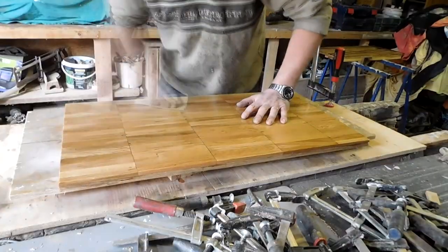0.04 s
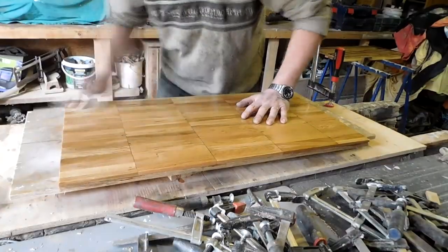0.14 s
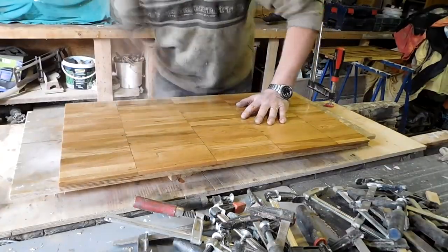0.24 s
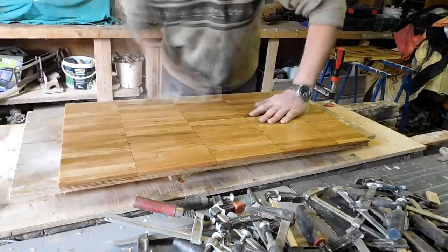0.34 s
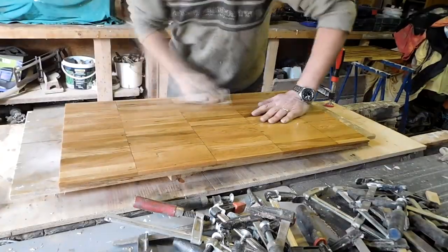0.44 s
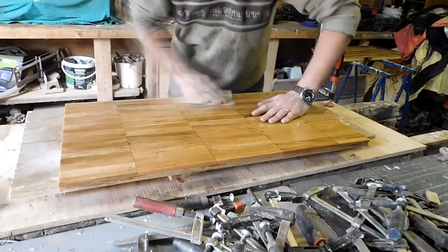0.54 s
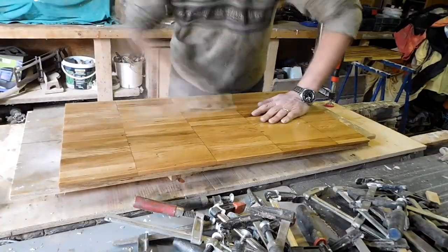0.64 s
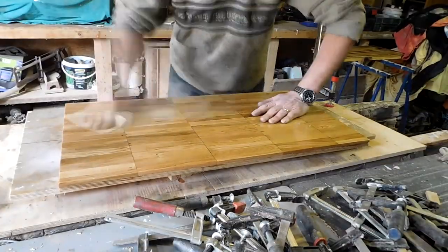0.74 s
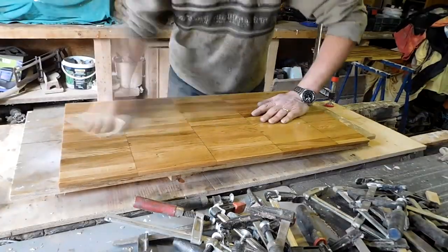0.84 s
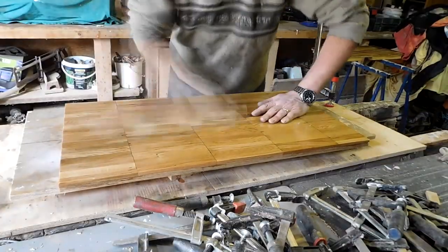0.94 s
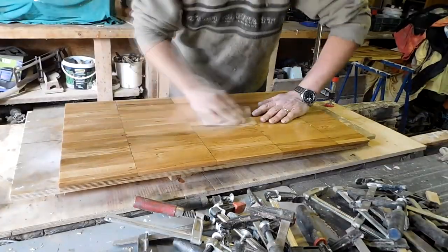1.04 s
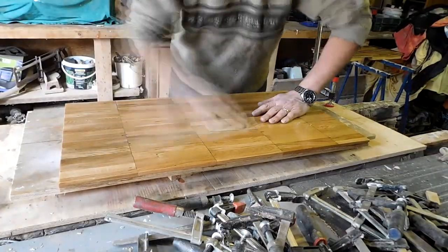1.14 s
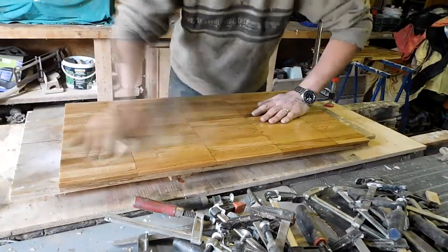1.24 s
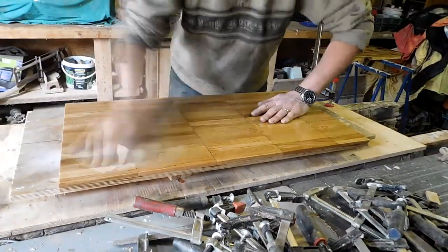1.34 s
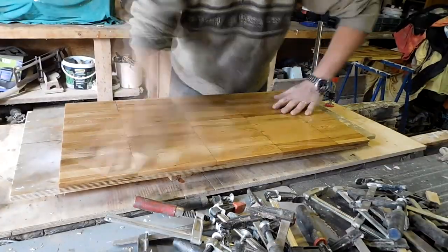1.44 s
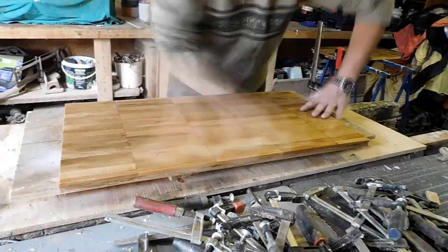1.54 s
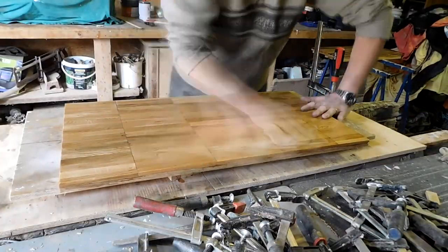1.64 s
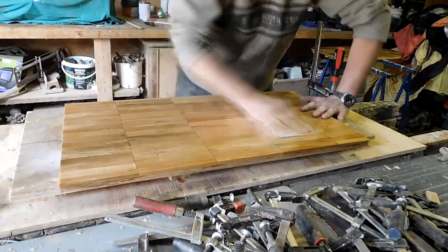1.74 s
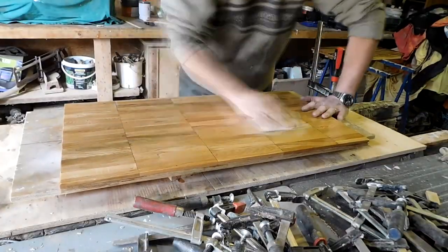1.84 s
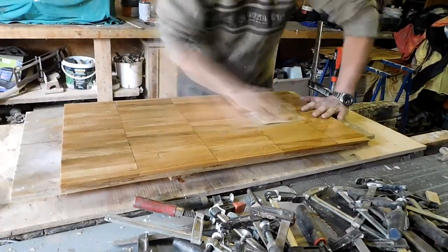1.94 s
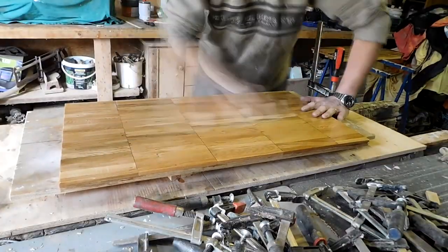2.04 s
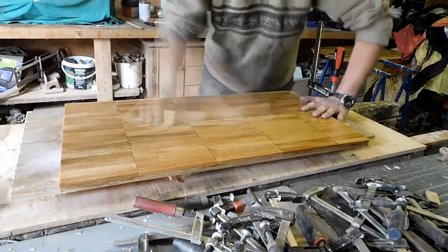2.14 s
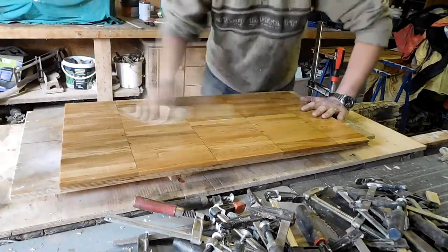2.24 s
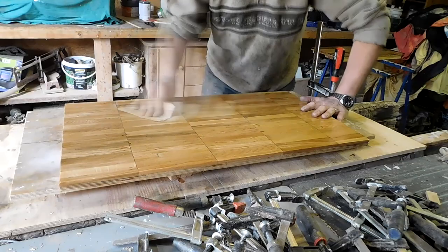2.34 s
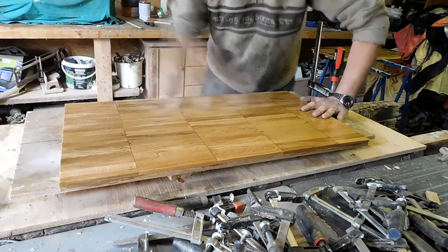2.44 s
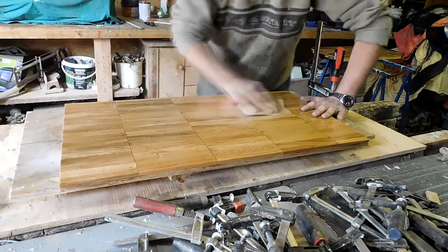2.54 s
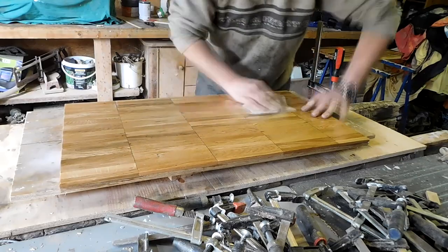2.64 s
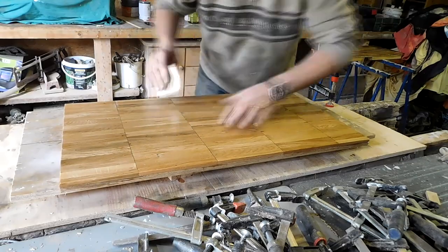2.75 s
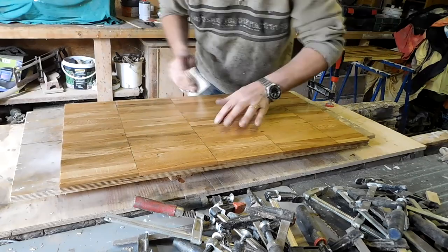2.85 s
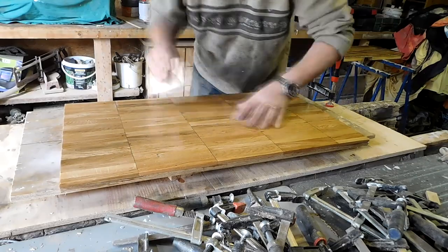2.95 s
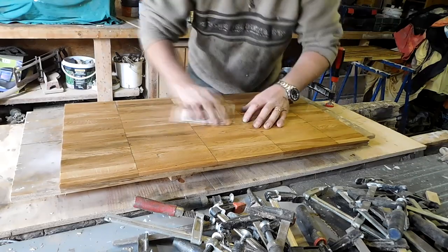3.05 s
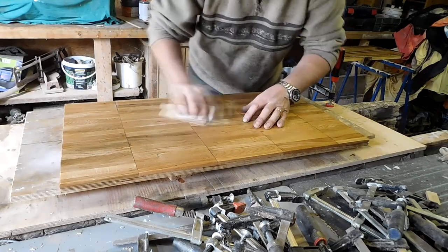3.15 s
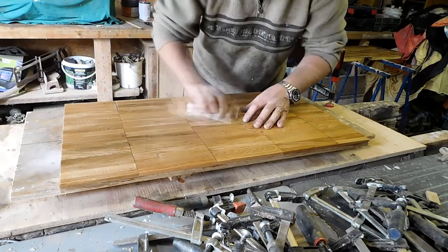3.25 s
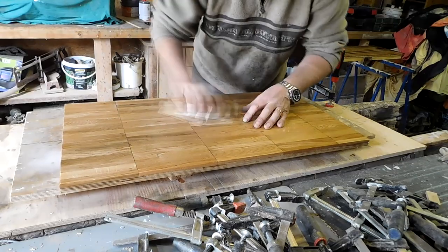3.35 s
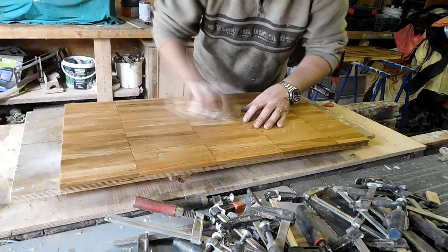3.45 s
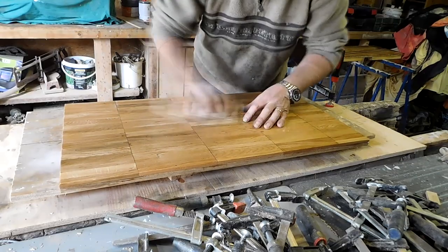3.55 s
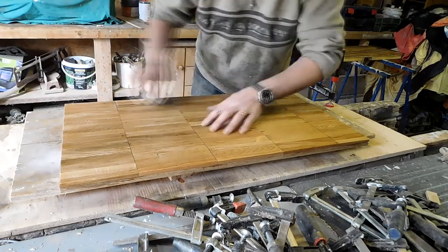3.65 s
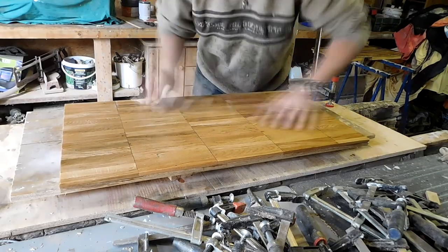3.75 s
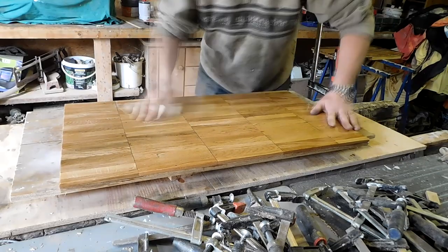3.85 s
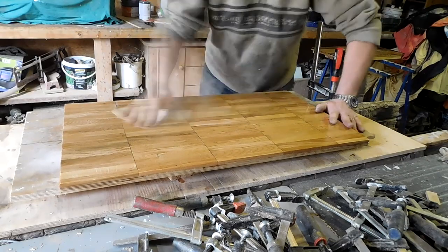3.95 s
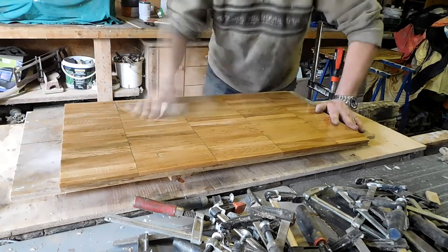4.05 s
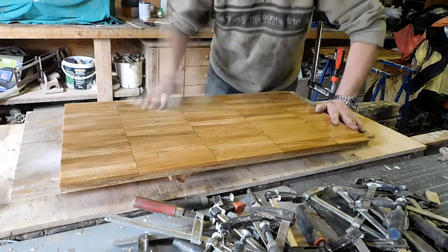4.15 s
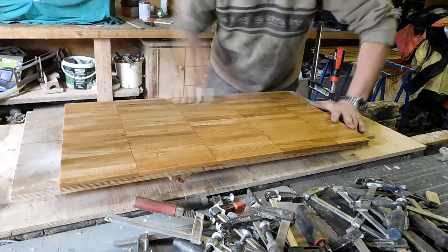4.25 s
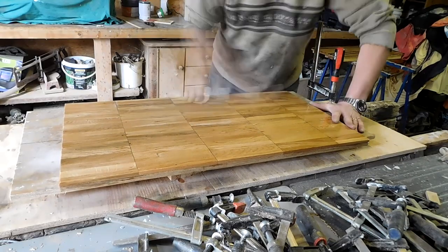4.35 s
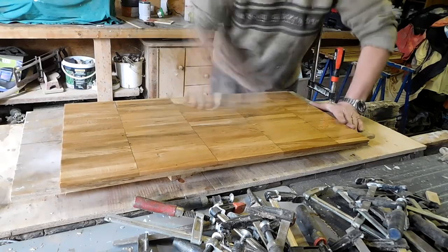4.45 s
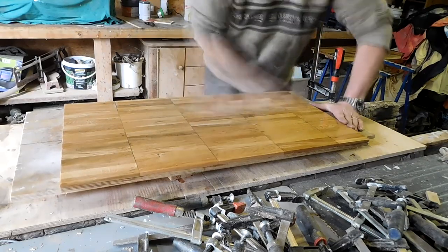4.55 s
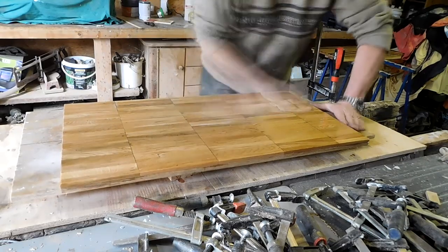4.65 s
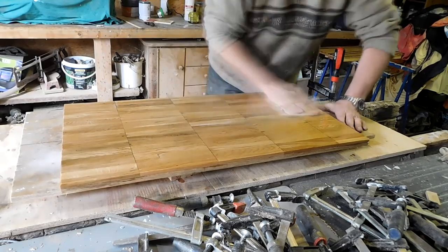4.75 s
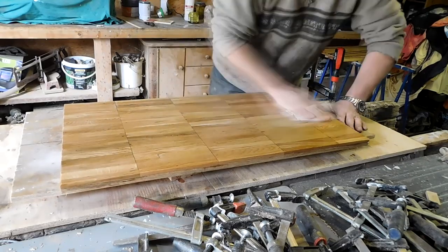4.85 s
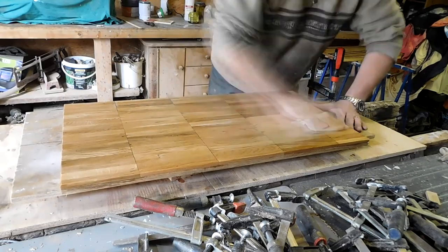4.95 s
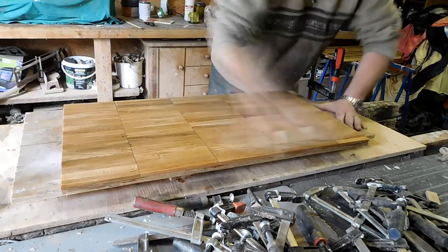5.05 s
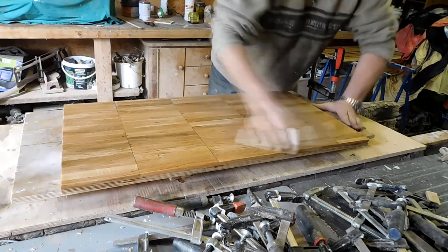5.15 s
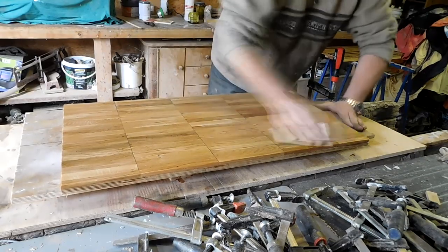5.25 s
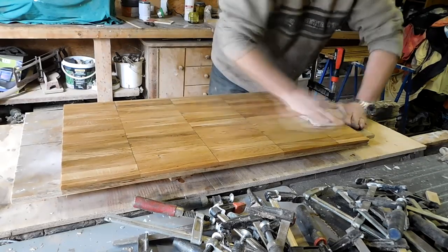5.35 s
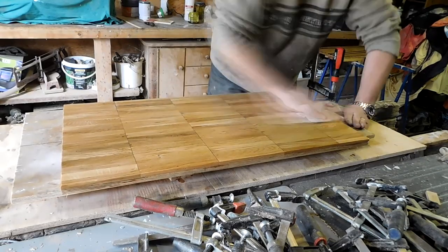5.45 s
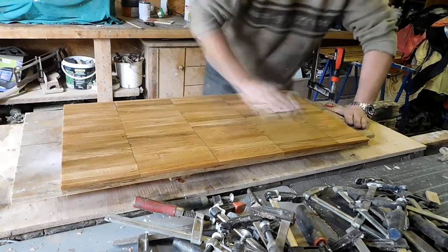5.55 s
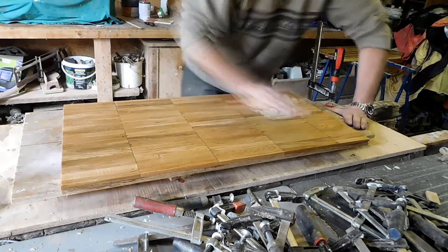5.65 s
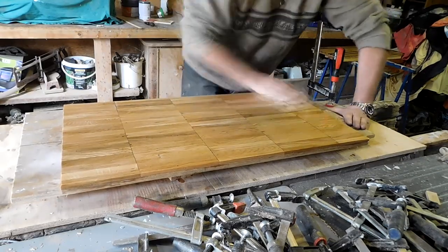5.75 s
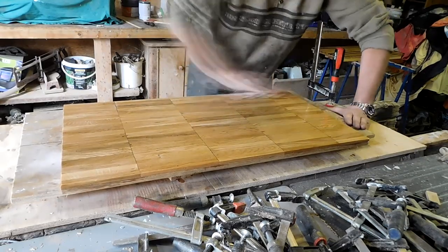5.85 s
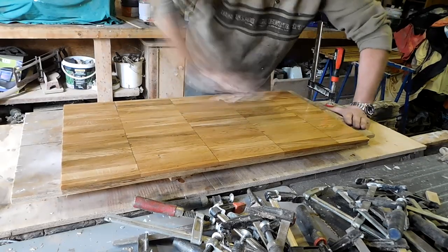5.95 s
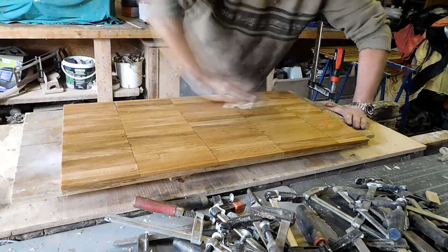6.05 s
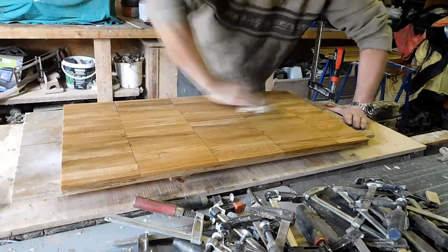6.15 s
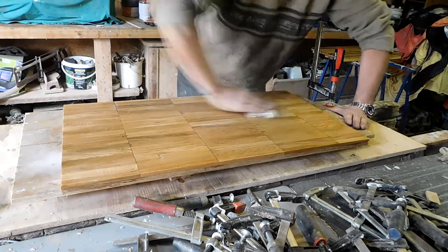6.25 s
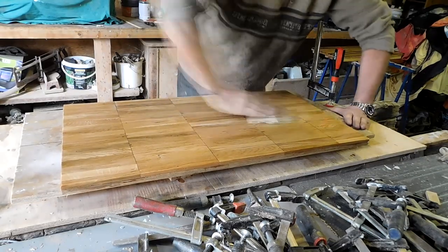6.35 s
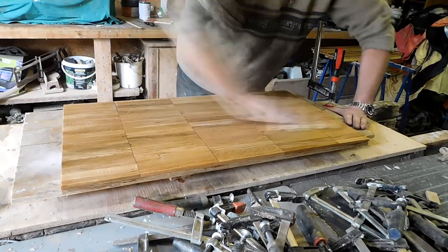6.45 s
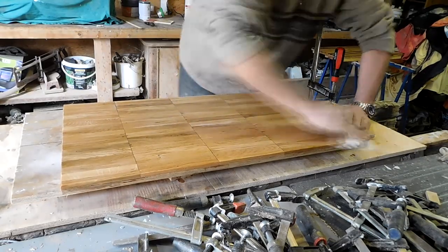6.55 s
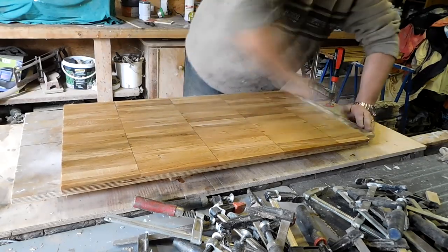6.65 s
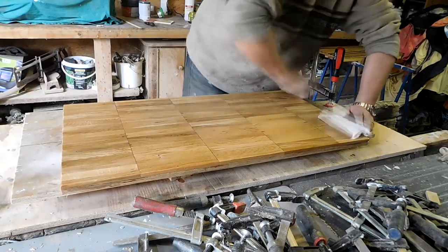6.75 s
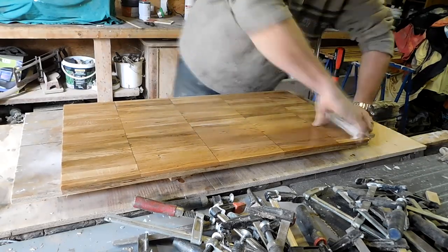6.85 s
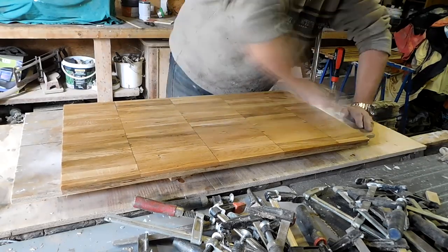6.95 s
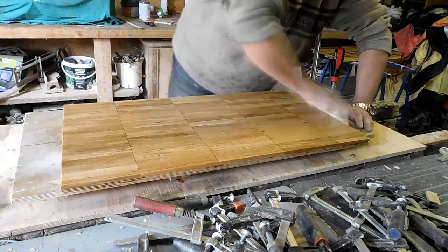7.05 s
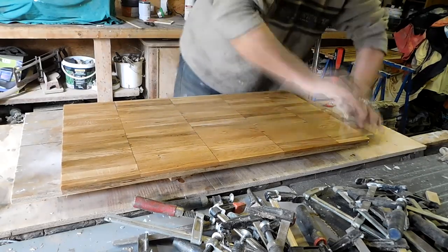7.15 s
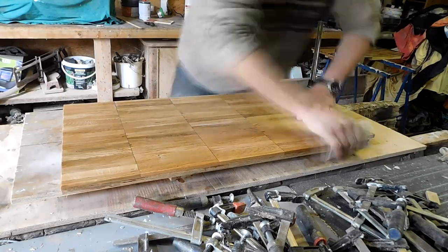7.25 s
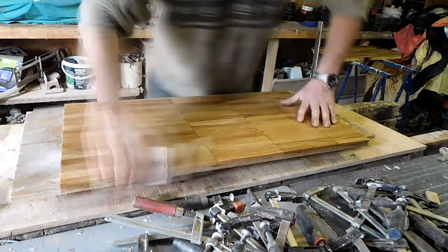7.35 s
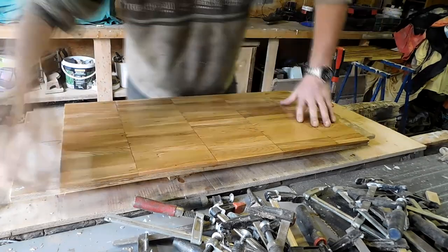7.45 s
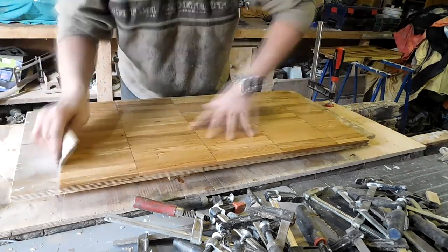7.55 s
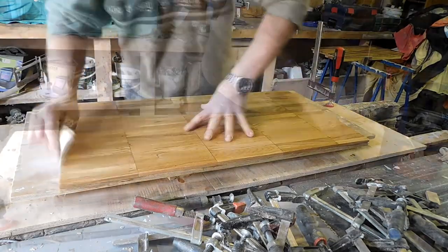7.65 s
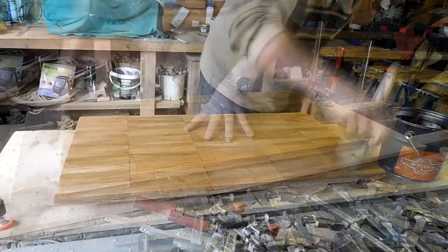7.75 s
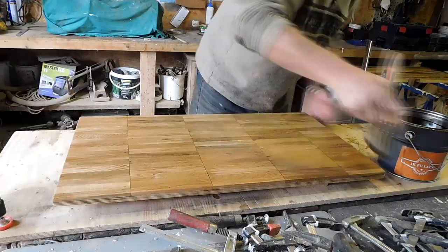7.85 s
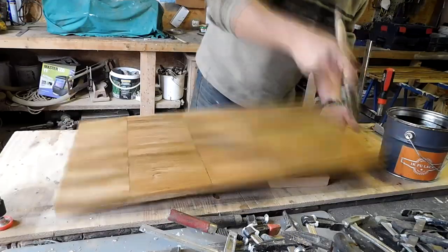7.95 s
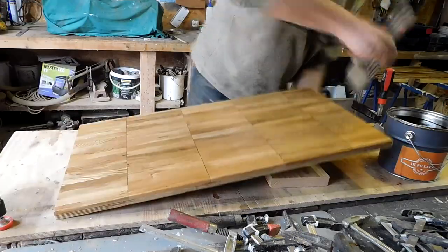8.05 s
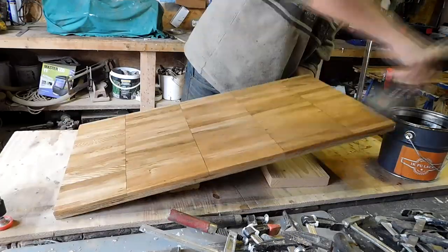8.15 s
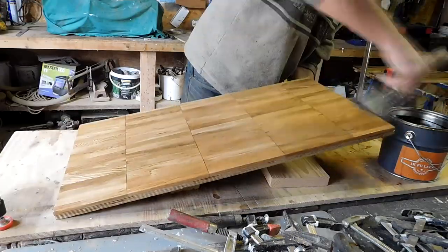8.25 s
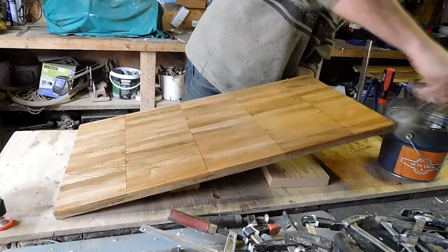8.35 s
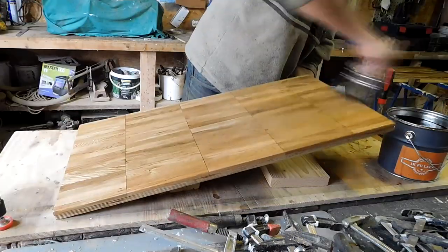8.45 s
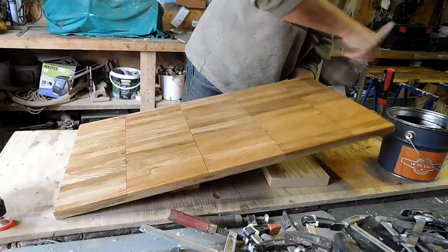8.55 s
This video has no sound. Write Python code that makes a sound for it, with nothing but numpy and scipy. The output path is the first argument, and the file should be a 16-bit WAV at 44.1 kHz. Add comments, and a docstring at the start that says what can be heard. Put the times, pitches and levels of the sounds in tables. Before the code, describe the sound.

A hand sands wood with gritty paper, quickly back and forth, bright and scratchy. There is a short pause, a few rough scuffs, another pause, then firm strokes again that gradually soften, with a dull bump or two. Final separate swipes give way to one strong, rough wooden knock, then only tiny soft rustles. Heard closely in a small workshop with faint dull background air.

```python
"""Sandpaper scrubs a wooden board in a workshop, in very quick hand strokes, lifted now and then.
Grit is a dense click train: its hiss, fizz, hum and board body follow the stroke and dip at each turn.
The paper chatters in narrow noise bands and rustles when off the wood; noise pushes ring the board's modes,
loudest near the end as the board is knocked down on its block. A low hum sounds as the board is shifted.
Short echoes and a quiet air noise make the workshop."""
import sys
import numpy as np
from scipy import signal
from scipy.fft import rfft, irfft, next_fast_len
from scipy.io import wavfile
from scipy.ndimage import uniform_filter1d

SR = 44100
rng = np.random.default_rng(int(sys.argv[2]) if len(sys.argv) > 2 else 0)


def gain_from_db(level_db):
    """Convert decibel levels to linear amplitude factors (20 dB per decade)."""
    decades = np.asarray(level_db, float) / 20
    return 10 ** decades


def dump(signal):
    """Clip the signal to [-1, 1] and save it as 16-bit WAV at the path in sys.argv[1]."""
    limited = np.clip(np.atleast_2d(signal).T, -1, 1)
    pcm = np.round(limited * 32767).astype(np.int16)
    wavfile.write(sys.argv[1], SR, pcm)


N = 379260


def evened(x):
    """Scales to rms 1."""
    return x / np.sqrt(np.mean(x ** 2) + 1e-20)


def read(points, hz):
    """Interpolates a table on a log-frequency axis."""
    f, value = np.transpose(points)
    return np.interp(np.log(hz + 1), np.log(f + 1), value)


def coloured(x, points):
    """Filters x by a (hz, gain_db) table, then scales to rms 1."""
    size = next_fast_len(N)
    gain = gain_from_db(read(points, np.fft.rfftfreq(size, 1 / SR)))
    return evened(irfft(rfft(x, size) * gain, size)[..., :N])


def turns():
    """Times (s) and depths (dB) of the hand's turns: evenly spread through each run, then jittered."""
    # runs of even strokes: first_turn_s, strokes_until_next_row, even_turn_dip_db, odd_turn_dip_db
    runs = [(0.043, 3, 5.5, 3.5), (0.152, 1, 5.5, 0), (0.186, 6, 6, 8.5), (0.449, 5, 9.5, 8.5),
            (0.673, 7, 8.5, 10), (0.967, 15, 7, 7.5), (1.601, 1, 7, 8.5), (1.655, 8, 10, 9.5),
            (2.024, 7, 10.5, 9), (2.34, 8, 7.5, 11.5), (2.687, 1, 10, 6), (3.309, 5, 6, 5),
            (3.48, 5, 6.5, 9), (3.651, 1, 4.5, 0), (3.881, 4, 12, 6), (4.082, 4, 9.5, 5.5),
            (4.284, 2, 9, 6.5), (4.377, 4, 14.5, 4), (4.565, 4, 9, 8), (4.752, 6, 8.5, 5),
            (5.026, 6, 9.5, 5.5), (5.289, 4, 10.5, 7), (5.447, 2, 12, 8), (5.521, 3, 9, 3),
            (5.63, 5, 2.5, 1.5), (5.801, 4, 5, 2), (5.961, 3, 7, 10), (6.101, 4, 8, 12), (6.288, 1, 6, 2),
            (6.335, 2, 5, 4), (6.425, 1, 6, 1), (6.716, 1, 9.5, 0), (6.779, 1, 7.5, 0),
            (7.078, 1, 9.5, -0.5), (7.424, 1, 6, 0), (7.475, 1, 11.5, 0), (7.629, 2, 13, 8),
            (7.735, 1, 6, 0), (7.771, 1, 8.5, 0)]
    uneven_s, uneven_db = 0.001, 0.9
    rows = []
    for (start_s, strokes, even_db, odd_db), following in zip(runs, runs[1:] + runs[-1:]):
        for k in range(round(strokes)):
            turn_s = start_s + (following[0] - start_s) * k / round(strokes)
            rows.append((turn_s, (even_db, odd_db)[k % 2]))
    jitter = rng.standard_normal((len(rows), 2)) * [uneven_s, uneven_db]
    return (np.array(rows) + jitter).T


def dip_db(t, turn_s=0.036, sharp=2.44):
    """The hand slows into each turn and speeds up out of it, so the hiss dips there."""
    s, depth_db = turns()
    nearest = np.searchsorted((s[1:] + s[:-1]) / 2, t)
    return depth_db[nearest] * np.clip(1 - abs(t - s[nearest]) / turn_s, 0, 1) ** sharp


def touch_db(t):
    """Hiss level and relative fizz level: paper lands, bites and lifts, leaving a rustle in between."""
    # bite of the paper on the wood: time_s, mid_stroke_hiss_db
    pressure = [(0.0, -39.5), (0.26, -36), (0.515, -36), (0.95, -38), (1.37, -38), (1.5, -40), (1.78, -37),
                (2.7, -37), (2.72, -40.5), (2.738, -52), (2.762, -44), (2.785, -58), (3.069, -52),
                (3.111, -59), (3.191, -42), (3.215, -46.5), (3.34, -48), (3.643, -42.5), (3.842, -39.5),
                (3.912, -34), (3.96, -35), (4.389, -39.5), (4.966, -37.5), (5.3, -44), (6.03, -43.5),
                (6.58, -47), (6.63, -57), (6.665, -45.5), (6.7, -41), (6.806, -45.5), (6.925, -60),
                (7.008, -44), (7.055, -38), (7.169, -45.5), (7.276, -53), (7.346, -41), (7.389, -34.5),
                (7.446, -40), (7.51, -39), (7.62, -52), (7.71, -48), (7.78, -44.5), (7.822, -42),
                (8.234, -78.5), (8.49, -77), (8.575, -60)]
    # paper on the wood: lands_s, lifts_s, landing_db_per_s, fizz_over_hiss_db (at firm pressure),
    # rustle_db (settled, after the lift)
    touches = [(0.0, 2.785, 903, -4, -86), (3.065, 3.645, 1600, -22, -79), (3.84, 6.626, 1150, -6.5, -70),
               (6.635, 6.81, 400, -5, -72.5), (6.922, 6.94, 620, -16, -79), (7.008, 7.176, 550, -11, -72),
               (7.269, 7.281, 1500, -25, -78), (7.346, 7.504, 760, -14, -67), (7.62, 7.83, 300, -6, -81.5),
               (8.234, 8.27, 53, -7, -92), (8.35, 8.51, 190, -10, -89), (8.575, 8.64, 570, 0, -78)]
    lifting_db_per_s = 589
    flap_db, flap_s = 12, 0.046  # extra rustle just after a lift, and its decay
    fizz_follows, firm_db = 0.67, -37  # fizz weakens more than hiss below firm pressure
    lands, lifts, landing, fizz_db, rustle_db = np.transpose(touches)
    bites = []
    for land_s, lift_s, rate in zip(lands, lifts, landing):
        held_db = np.interp(t.clip(land_s, lift_s), *np.transpose(pressure))
        off_db = np.maximum(rate * (land_s - t), lifting_db_per_s * (t - lift_s)).clip(0)
        bites.append(held_db - off_db)
    bite_db = np.max(bites, 0)
    last = np.searchsorted(lifts, t).clip(1) - 1
    flapping_db = flap_db * np.exp(-abs(t - lifts[last]) / flap_s)
    rustle_db = np.where(t > lifts[0], rustle_db[last] + flapping_db, -120)
    nearest = np.searchsorted((lifts[:-1] + lands[1:]) / 2, t)
    eased_db = np.clip(firm_db - np.interp(t, *np.transpose(pressure)), -5, 10)
    return np.maximum(bite_db, rustle_db), fizz_db[nearest] - fizz_follows * eased_db


def grains(per_s, spread_db, patchy_db):
    """Grit tears fibres: a dense click train, patchy in time and pitch, placed between two ears."""
    # hand position: time_s, left_ear_lag_us
    place = [(0, -32), (1.3, -13), (1.7, 16), (4.1, -4.5), (4.8, 24), (7.2, 46.5), (7.7, -64), (8.2, -38)]
    # left-right likeness: hz, likeness (0-1)
    likeness = [(60, 0.4), (400, 0.65), (2400, 0.81), (15000, 0.41)]
    # microphone pair: hz, left_over_right_db
    bias = [(900, 0.5), (3000, -1.5), (15000, 3)]
    size = gain_from_db(spread_db * np.minimum(rng.exponential(1, (2, N)), 4))
    clicks = size * (rng.random((2, N)) < per_s / SR) * rng.standard_normal((2, N))
    hz, t, z = signal.stft(clicks, SR, nperseg=256, noverlap=192)
    patches = rng.standard_normal((len(t), len(hz))).T
    patches = uniform_filter1d(patches, size=4, axis=0)
    patches = evened(uniform_filter1d(patches, size=24, axis=1))
    same = np.clip(read(likeness, hz), 0, 1)[:, None]
    lag_us = np.interp(t, *np.transpose(place))
    near = gain_from_db(-0.012 * lag_us)  # the nearer ear is a little louder
    left = z[0] * np.exp(-2j * np.pi * hz[:, None] * 1e-6 * lag_us) * near
    right = (same * z[0] + np.sqrt(1 - same ** 2) * z[1]) / near
    lean = gain_from_db(read(bias, hz) / 2)[:, None]
    pair = np.array([left * lean, right / lean]) * gain_from_db(patchy_db * patches)
    return signal.istft(pair, SR, nperseg=256, noverlap=192)[1][:, :N]


def sanding():
    """Hiss, fizz, hum and board body follow the stroke: fizz dips most at a turn, the heavy board least."""
    # spectra of the four layers: hz, gain_db (relative)
    hiss_shape = [(900, -61), (1900, -14), (3000, -0.5), (5000, 0.5), (9000, -11.5), (16000, -25)]
    fizz_shape = [(3500, -29.5), (7000, 2), (11000, -3), (16000, -8.5)]
    hum_shape = [(450, -34.5), (750, -5), (970, -7), (1160, -1.5), (1480, -5), (2300, -3), (3600, -16.5),
                 (6000, -59)]
    body_shape = [(30, -69), (80, -33), (160, -19), (260, -14), (330, -9), (440, -1.5), (560, -3),
                  (900, -22)]
    # scuff hum and low board body: time_s, hum_over_hiss_db, body_over_hiss_db
    scuff = [(0.05, -2.5, -22), (0.3, -7, -23.5), (0.7, -5, -19.5), (2.72, -4.5, -20.5), (3.08, 5, -8),
             (3.14, 5, -18), (3.2, 0.5, -20), (3.25, 0, -21), (3.35, 0.5, -14.5), (3.62, -4.5, -17.5),
             (3.76, 10, -14), (3.86, -6.5, -21.5), (4.1, -5.5, -20.5), (4.5, -4.5, -13), (4.9, -7.5, -20),
             (5.25, -3.5, -14.5), (5.8, -1, -15.5), (6.55, -2, -11.5), (6.62, 4, -7), (6.7, 1, -11.5),
             (7.05, -3, -20), (7.27, 10, 1.5), (7.4, -6.5, -22.5), (7.6, 9.5, 3), (7.8, 0.5, -15.5),
             (7.87, 2.5, -9), (7.92, 17, 6), (8.3, 11, -4), (8.56, 3.5, -18)]
    t = np.arange(N) / SR
    full_db, fizz_db = touch_db(t)
    turn_db = dip_db(t)
    s, *levels = np.transpose(scuff)
    hum_db, body_db = (np.interp(t, s, level) for level in levels)
    grit = grains(per_s=26000, spread_db=1.1, patchy_db=1.2)
    hiss = coloured(grit, hiss_shape) * gain_from_db(full_db - turn_db)
    fizz = coloured(grit, fizz_shape) * gain_from_db(full_db - 1.95 * turn_db + fizz_db)
    hum = coloured(grit, hum_shape) * gain_from_db(full_db - 0.79 * turn_db + hum_db)
    body = coloured(grit, body_shape) * gain_from_db(full_db - 0.5 * turn_db + body_db)
    return hiss + fizz + hum + body


def narrow_noise(start_s, end_s, hz, pole_width_hz, level_db, fade_s):
    """Noise through four equal resonant poles, shifted to hz, faded in and out, alike at both ears."""
    t, r = np.arange(N) / SR, np.exp(-np.pi * pole_width_hz / SR)
    wobble = rng.standard_normal(N) + 1j * rng.standard_normal(N)
    for _ in range(2):
        wobble = signal.lfilter([1], [1, -2 * r, r * r], wobble)
    fade = np.clip(np.minimum(t - start_s, end_s - t) / fade_s, 0, 1)
    return gain_from_db(level_db) * fade * evened((wobble * np.exp(2j * np.pi * hz * t)).real)


def chatter():
    """The paper chatters in one band for a while: short stretches of narrow noise."""
    # stretches: start_s, end_s, centre_hz, pole_width_hz, level_db
    stretches = [(0, .27, 1508, 900, -50), (.2, 1.45, 1214, 300, -59.5), (3.062, 3.09, 1200, 380, -52),
                 (3.115, 3.145, 1950, 1000, -47), (3.15, 3.178, 2110, 1500, -46),
                 (3.175, 3.201, 2112, 1960, -38.5), (3.203, 3.239, 1397, 1000, -43)]
    return sum(narrow_noise(*row, fade_s=0.0054) for row in stretches)


def shop(x):
    """Sparse echoes of random sign, each band dying at its own speed."""
    # echo decay: hz, t60_s
    decay = [(500, 0.14), (4000, 0.074), (12000, 0.099)]
    taps = np.zeros((2, SR // 2))
    at = np.arange(200, SR // 2 - 20, 20)
    at = at + rng.integers(0, 20, (2, len(at)))
    np.put_along_axis(taps, at, rng.choice([-1., 1.], at.shape), 1)
    hz, t, z = signal.stft(taps, SR, nperseg=256)
    t60_s = np.maximum(read(decay, hz), 0.02)[:, None]
    tail = signal.istft(z * gain_from_db(-60 * t / t60_s), SR, nperseg=256)[1]
    return signal.oaconvolve(x.mean(0)[None], tail / np.linalg.norm(tail[0]), axes=1)[:, :N]


def air():
    """Quiet, dull workshop background: noise partly shared between the ears."""
    # spectrum: hz, gain_db (relative)
    air_shape = [(24, -65), (40, -33), (229, -20.5), (377, -9), (606, -3), (1860, -9), (4460, -41.5),
                 (15500, -40)]
    shared, apart = rng.standard_normal(N), rng.standard_normal((2, N))
    return gain_from_db(-69) * coloured(shared + 0.96 * apart, air_shape)


def knocks(push_s=0.0032, crack_db=-3, crack_s=0.014, ears_s=5e-5):
    """A rough push of a few ms, each with its own brightness, rings the board's modes; the faces crack."""
    # board modes: mode_hz, level_db, t60_s
    board = [(102, -26, .08), (178, -24, .07), (345, -13, .05), (397, -8, .05), (455, -5, .045),
             (558, -7, .05), (735, -3, .032), (824, 1, .035), (915, -1, .03), (1095, 4, .028),
             (1300, 5, .018), (1500, 5, .02), (1825, 3, .022), (2190, -5, .018)]
    # blows on the board, and the low thud under the main knock: time_s, level_db, top_hz (brightness)
    blows = [(1.611, -68, 150), (2.08, -54, 400), (2.095, -67, 110), (4.565, -66, 200), (5.741, -41, 1000),
             (6.086, -55, 450), (6.1, -65, 130), (8.052, -50, 160), (7.997, -43, 750), (8.009, -43.5, 650),
             (8.038, -48, 1000), (8.047, -25, 1900), (8.058, -25.5, 1900), (8.068, -23.5, 1800),
             (8.079, -30, 1300)]
    t, out = np.arange(8000) / SR, np.zeros((2, N))
    hz, mode_db, t60_s = np.transpose(board)[:, :, None]
    delay_s = abs(ears_s * rng.standard_normal((2, *hz.shape)))  # own path from each mode to each ear
    waves = gain_from_db(mode_db - 60 * t / t60_s) * np.sin(2 * np.pi * hz * (t - delay_s).clip(0))
    for s, db, top_hz in blows:
        rough = rng.standard_normal((3, len(t)))
        modes = (waves / (1 + (hz / top_hz) ** 4)).sum(1)
        push = rough[:1] * t * np.exp(-t / push_s)
        ring = signal.fftconvolve(push, modes, axes=1)[:, :len(t)]
        band = signal.butter(2, [top_hz / 4, 0.8 * top_hz], "band", fs=SR)
        dull = signal.lfilter(*band, rough[0] + 0.7 * rough[1:])
        crack = gain_from_db(crack_db) * evened(dull) * (1 - np.exp(-t / push_s)) * np.exp(-t / crack_s)
        thin = signal.butter(3, min(top_hz / 2, 340), "high", fs=SR)  # keeps the blow's bass light
        blow = signal.lfilter(*thin, ring / np.std(ring[:, :600]) + crack)
        blow = signal.lfilter(*signal.butter(1, top_hz, fs=SR), blow)
        part = out[:, round(s * SR):][:, :len(t)]
        part += gain_from_db(db) * blow[:, :part.shape[1]]
    return out


def rustles():
    """Soft puffs of treble noise: rustles between strokes, and the breathy treble of the knocks."""
    # puffs: centre_s, half_length_s (to 1/e), level_db
    puff_rows = [(6.89, .07, -68.5), (7.56, .05, -59), (8.235, .04, -73), (8.368, 0.031, -72),
                 (8.455, .025, -74), (8.076, 0.026, -58.5)]
    # spectrum: hz, gain_db (relative)
    rustle_shape = [(2500, -20), (7000, -7), (16000, -7)]
    t = np.arange(N) / SR
    puffs = sum(gain_from_db(db) * np.exp(-((t - s) / half_s) ** 2) for s, half_s, db in puff_rows)
    return puffs * coloured(rng.standard_normal(N) + rng.standard_normal((2, N)), rustle_shape)


def drone():
    """A faint low hum while the board is shifted: one stretch of narrow noise."""
    # one row: start_s, end_s, centre_hz, pole_width_hz, level_db
    stretch = (7.34, 7.78, 110.5, 20, -78)
    return narrow_noise(*stretch, fade_s=0.04)


def scene():
    """Sanding, chatter, knocks and hum with their echoes, plus air and dry puffs."""
    work = sanding() + chatter() + knocks() + drone()
    return work + gain_from_db(-14.5) * shop(work) + air() + rustles()


def band_limit(x):
    """A steep low-pass at the top of the band."""
    return signal.sosfilt(signal.butter(12, 16190, fs=SR, output="sos"), x)


def record(dry):
    """Band limits: a gentle high-pass, then a steep treble cutoff."""
    # one row: low_hz, top_hz
    band_limits = (55, 15760)
    low_hz, top_hz = band_limits
    heard = signal.sosfilt(signal.butter(2, low_hz, "high", fs=SR, output="sos"), dry)
    lowpass = signal.firwin(511, top_hz, window=("kaiser", 9), fs=SR)
    heard = signal.oaconvolve(heard, lowpass[None], "same")
    return band_limit(heard)


dry = scene()
out = record(dry)
dump(out)
```